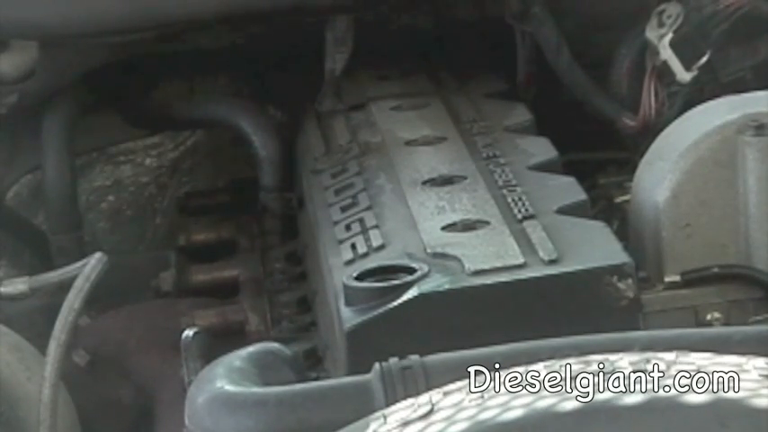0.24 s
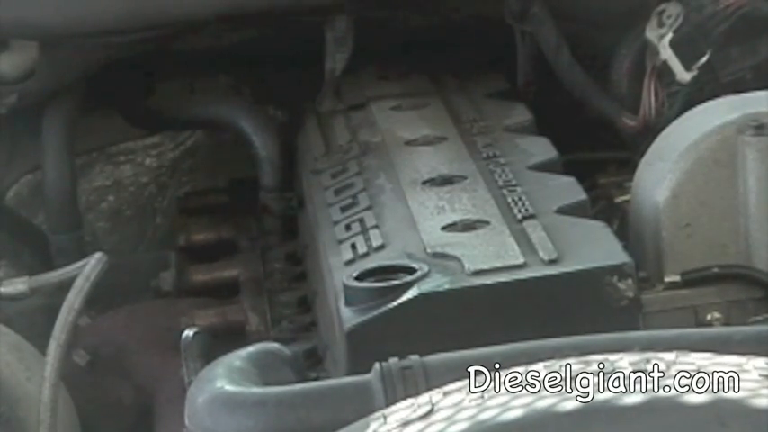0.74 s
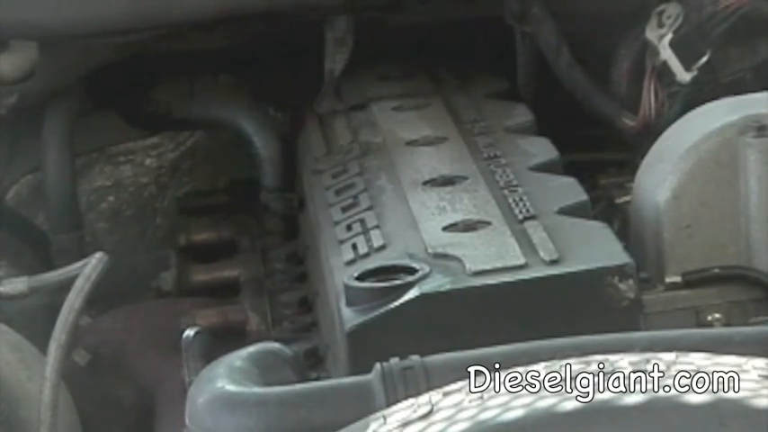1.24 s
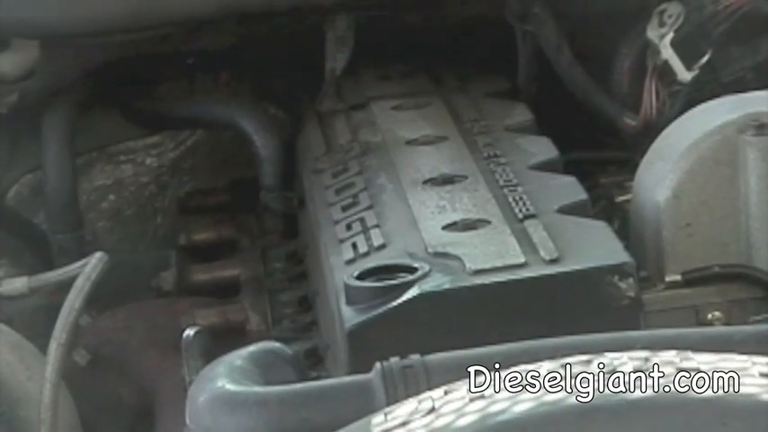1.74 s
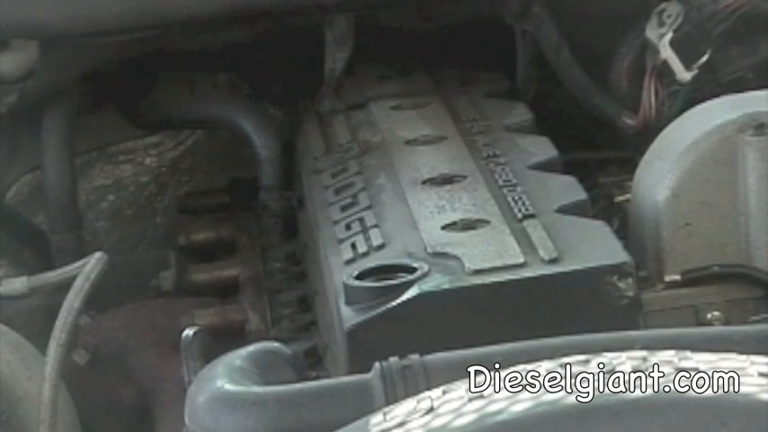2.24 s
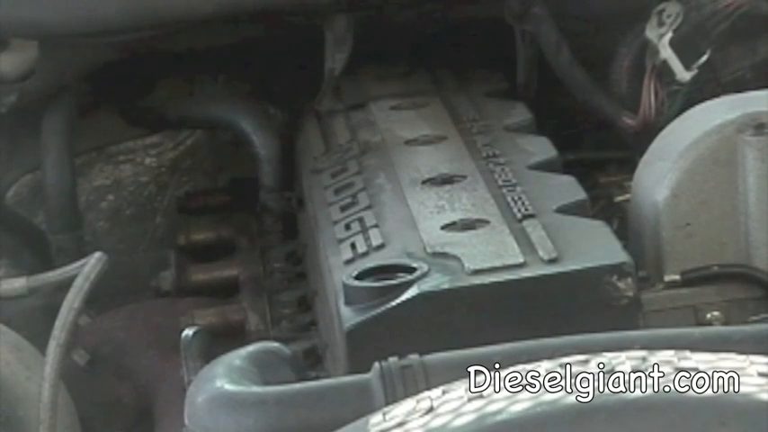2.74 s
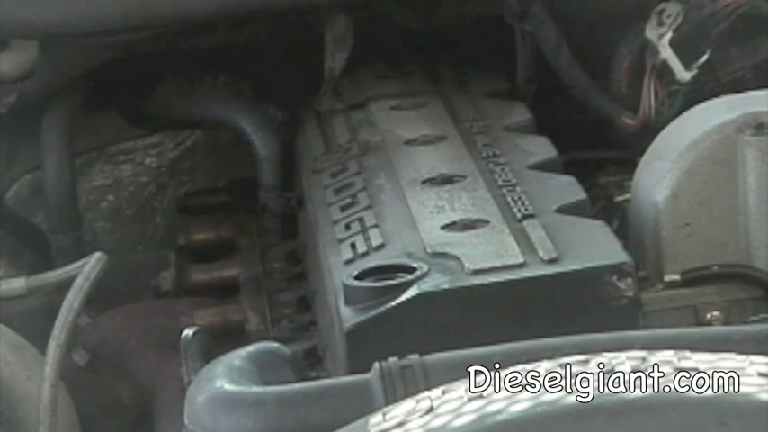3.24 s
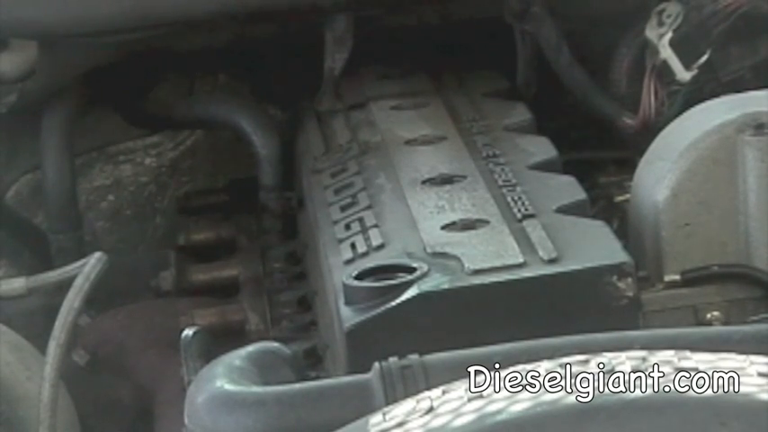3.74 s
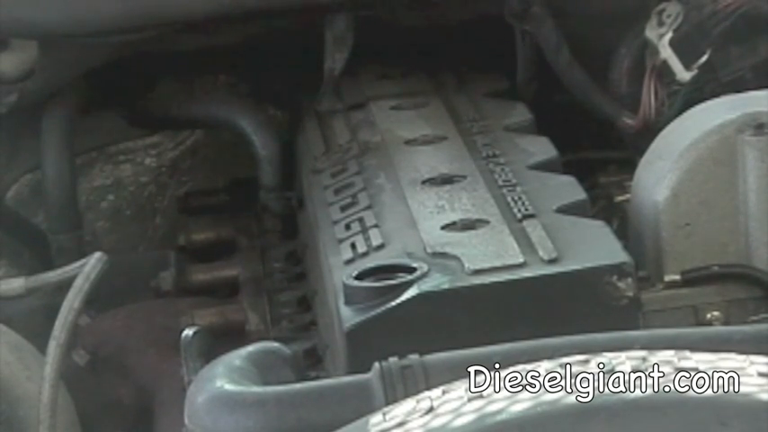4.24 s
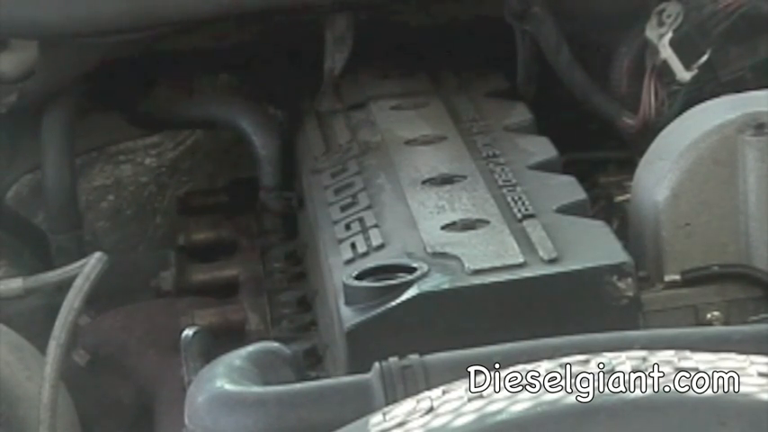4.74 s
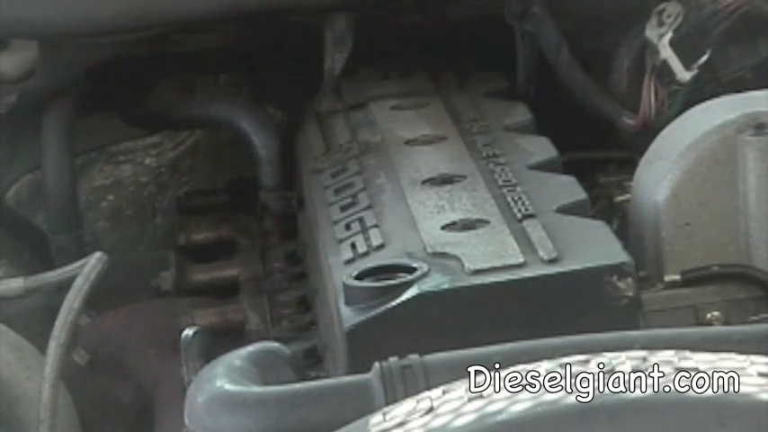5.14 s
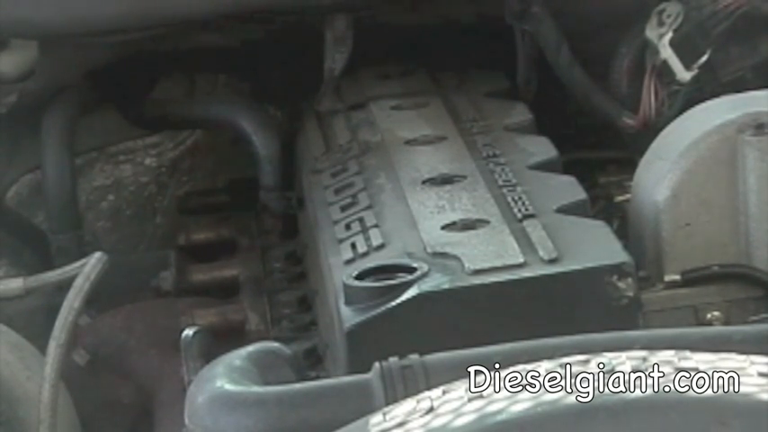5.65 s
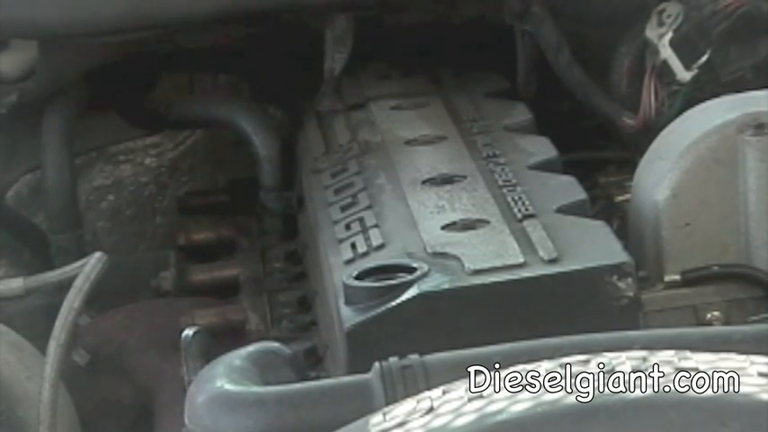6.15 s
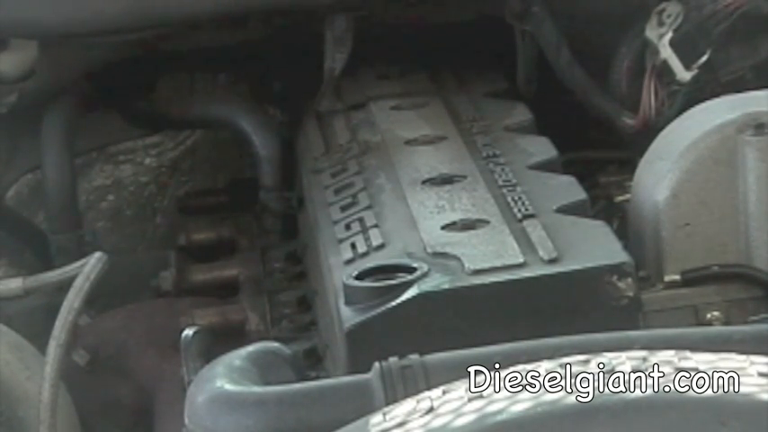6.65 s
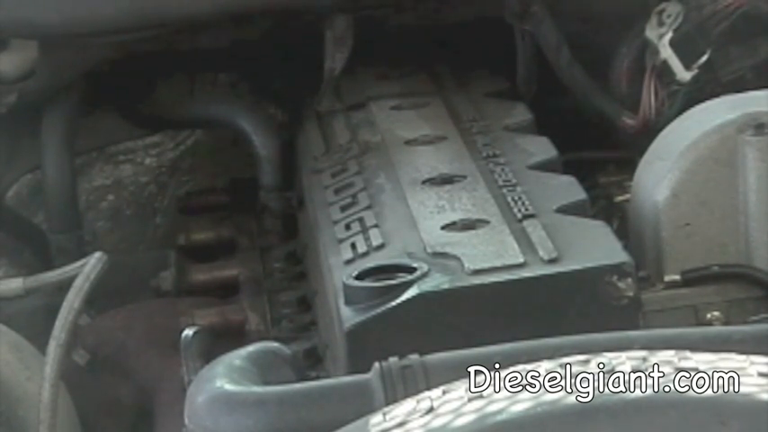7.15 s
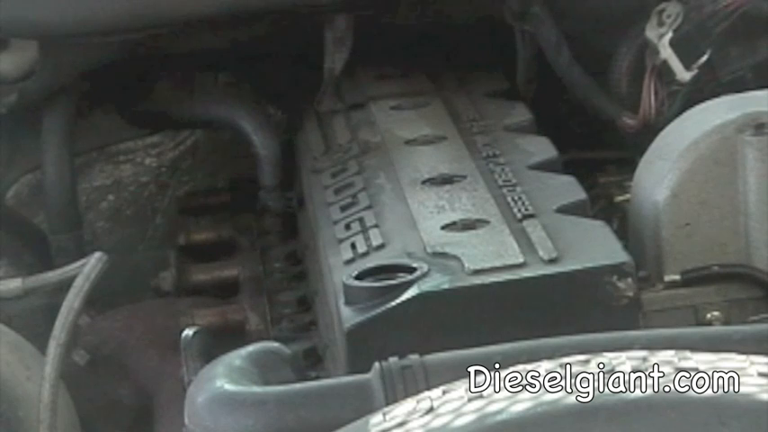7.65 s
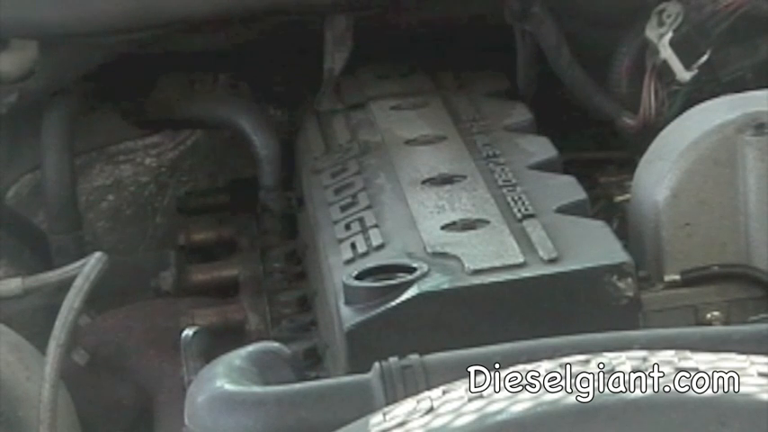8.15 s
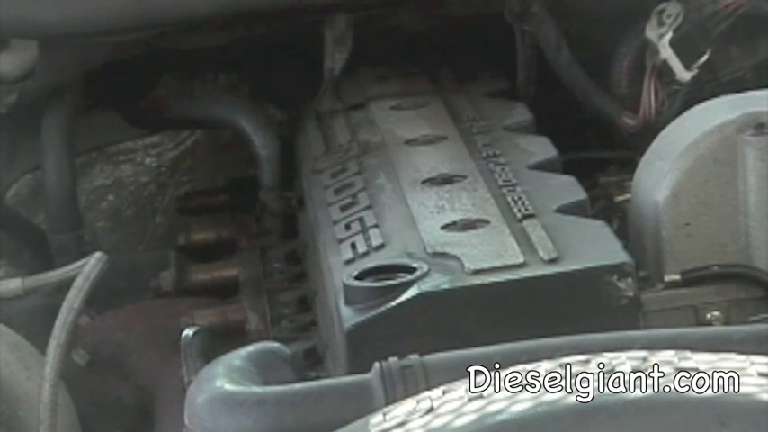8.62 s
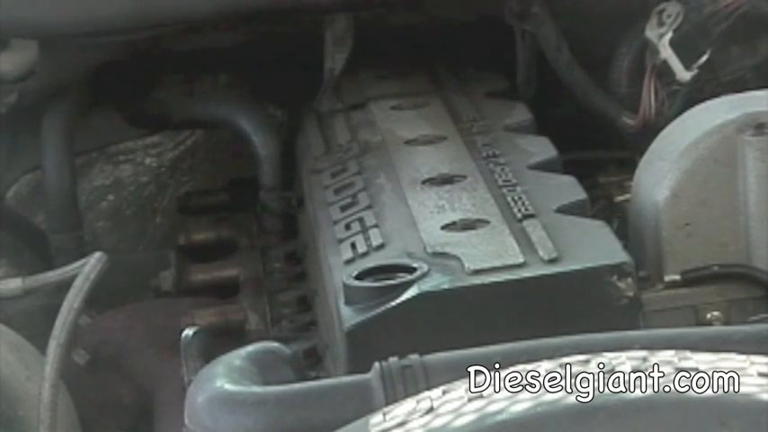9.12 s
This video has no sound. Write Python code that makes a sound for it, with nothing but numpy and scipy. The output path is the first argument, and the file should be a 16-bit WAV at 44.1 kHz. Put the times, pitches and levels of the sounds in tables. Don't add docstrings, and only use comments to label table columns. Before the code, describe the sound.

Faint outdoor hush and key clicks, a short harsh starter crank, then a big six-cylinder diesel fires up and clatters at steady idle.

```python
import sys
import numpy as np
from scipy import signal
from scipy.fft import rfft, irfft, next_fast_len
from scipy.io import wavfile
from scipy.ndimage import uniform_filter1d, map_coordinates

SR = 44100
rng = np.random.default_rng(int(sys.argv[2]) if len(sys.argv) > 2 else 0)


def log_audio(samples):
    frames = np.atleast_2d(samples).T
    limited = np.clip(frames, -1, 1)
    pcm = np.round(limited * 32767).astype(np.int16)
    wavfile.write(sys.argv[1], SR, pcm)


def gain_from_db(level_db):
    decades = np.asarray(level_db, float) / 20
    return 10 ** decades


N = 413658
T = np.arange(N) / SR

# (blow level [dB], blow delay [firings], clatter level [dB], ring level [dB],
# valve level [dB])
CYLINDERS = [(0, .93, 0, -2.5, -9), (-4, .9, 0, -1, -8), (-.5, .93, .5, -1, -7), (-7, .9, -1.5, -3, -8),
             (0, .9, -.7, -1.5, -6), (-6, .92, -1, 0, -7)]
# (frequency [Hz], level [dB per Hz])
CLATTER_COLOUR = [(180, -37), (300, -9), (874, -4.5), (1140, -4.5), (1230, -16), (1390, -4), (1740, -12.5),
                  (2270, -9), (4240, -21), (5000, -21.5), (5610, -24.5), (13000, -27.5), (15300, -67)]
# (frequency [Hz], level [dB per Hz])
BLOW_COLOUR = [(400, -29), (750, -8), (1000, -1), (1300, 4), (1550, -6), (2200, -17.5), (5000, -33)]
# (frequency [Hz], level [dB per Hz])
ROAR_COLOUR = [(15, -37), (25, -35), (50, -19), (75, -12), (143, -8.5), (250, -4.5), (798, -4), (1370, -5),
               (1740, -12.5), (2210, -13), (4220, -22), (4960, -23.5), (13000, -41), (14100, -30),
               (15300, -61)]
# (frequency [Hz], width [Hz], lift [dB])
BLOCK_MODES = [(231, 84, 4.5), (570, 230, 3), (808, 49, 6), (985, 92, 4), (1147, 58, 7.5), (1395, 154, 7),
               (1628, 35, 9.5), (1898, 110, 6.5), (2260, 100, 3.5), (2790, 92, 3), (3440, 19, 6),
               (3060, 70, -1.5), (930, 26, 3), (900, 35, -3), (1244, 33, 0), (1510, 50, -2),
               (4970, 140, 4.5), (5230, 230, -6.5), (6900, 280, 1.5), (8200, 1100, -2.5),
               (10050, 2700, 3.5), (45, 33, -4), (310, 39, -3.5), (485, 14, -3), (148, 25, -2.5)]
# (frequency [Hz], width [Hz], lift [dB])
INJECTOR_MODES = [(4940, 220, 6), (5200, 260, 6), (4600, 250, 3)]
# (time [s], blow change [dB], ring change [dB])
ODD_FIRINGS = [(1.981, -7.8, -2.3), (2.169, 0.9, 5.9), (2.193, 5, 5.1), (2.266, 10, 4.1), (2.316, 4.3, 1.9),
               (2.34, 5.8, 8), (2.491, 3.5, 4.1), (2.517, 6, -3), (2.842, 3.3, 1.2), (2.866, 5, 4),
               (2.916, 2.6, 4.1), (2.99, 2.7, 4), (3.015, 8, -2.2), (3.089, -6.4, 5.6), (3.213, 7, 0.5),
               (3.312, 0, 10), (3.362, 5.6, 5), (3.762, -9, 4.4), (3.988, -2, 9), (4.264, 8, 10),
               (4.439, 4.4, -1.9), (4.814, 8, -1.0), (4.889, 2, 11), (4.939, -9, -1.9), (5.264, 4.8, -6.9),
               (5.314, -16, 6), (5.761, 9, 1), (5.786, 2.0, 10), (5.811, 3, 3), (6.135, 1, 7.8),
               (6.21, 5, 0.5), (6.335, 1, 10), (6.56, 0, 0), (7.009, 1.5, 4), (7.034, 1, 4.7),
               (7.059, -8, 3.1), (7.234, 1.6, 7.1), (7.284, 2.5, -4.6), (7.608, -12, 3.7), (7.633, 0, 8.3),
               (7.758, 0, 4), (7.857, 5.0, 7), (7.907, 6, 3.8), (8.106, -7, 4), (8.23, 5.5, 1.2),
               (8.428, 3, 3.1), (8.576, 1, 3.4), (8.651, 4.5, -4.3), (8.725, -1, 6.3), (8.873, 3, -0.1),
               (8.898, -5, 8), (8.947, 7, 1), (8.972, 3, -0.9), (8.996, -6.8, 0.6), (9.021, 3, -5.3),
               (9.046, -6.4, -0.1), (9.12, 1, 3.8), (9.169, 0, 9), (9.268, 4, -4), (9.293, 9, 8)]
# (time [s], rate [firings per s])
SPEED = [(1.3, 22.15), (1.4, 41.06), (1.5, 54.82), (1.62, 56.83), (1.8, 49.26), (2.05, 42.41), (2.3, 40.44),
         (2.5, 39.21), (2.8, 40.59), (3.3, 40.23), (3.9, 39.71), (4.5, 40.07), (5.1, 39.96), (5.5, 40.3),
         (6.1, 40.04), (7.3, 40.04), (8.7, 40.48), (9.38, 40.51)]
# (time [s], level [dB])
FUEL = [
    (1.35, -5.5),
    (1.45, 1.5),
    (1.55, -4),
    (1.65, -2.5),
    (1.75, -6),
    (1.85, -5),
    (2.15, -0.9),
    (3.4, 0.2),
    (5.3, 0.14),
    (9.38, -1),
]
# (multiple of firing rate [-], level [dB], phase [rad])
EXHAUST = [(1, -56, 3), (2, -40.5, -1), (3, -51, 2.5), (4, -47.5, -1.1), (5, -39, 2), (6, -48.5, 0),
           (10, -39, 1.4), (20, -38.5, -0.5)]
# (time [s], level [dB], level of upper multiples [dB])
EXHAUST_SWELL = [
    (1.3, -23, -15),
    (1.45, -2, -12),
    (1.55, -1, -26),
    (1.75, -11.5, -17),
    (1.95, -1, 4),
    (2.4, -1, -4),
    (2.6, -3, 0),
    (6, -1, 1),
    (9.38, -9, 0),
]
# (centre time [s], length [s], start pitch [Hz], end pitch [Hz], level [dB])
WHINES = [(3.0, 3.6, 590, 584, -25), (5.2, 2.2, 560, 568, -24), (6.55, 1.3, 566, 556, -23),
          (5.1, 3, 742, 733, -24), (7.55, 2.2, 695, 640, -21.5), (7.8, 1.6, 528, 495, -26),
          (4.9, 2.6, 822, 822, -26), (6.2, 1.6, 243, 240, -27), (8.8, 1.1, 812, 808, -26),
          (2.2, 1.4, 800, 806, -27), (4.4, 1.2, 408, 400, -29), (7.9, 1, 215, 205, -28),
          (2.8, 1.2, 430, 428, -28)]
# (lap [count], level change [dB])
BELT_ODD_LAPS = [(2, 6), (5, 6), (7, 5), (8, -8), (10, 7), (11, -8), (15, 10), (17, 6), (19, -8), (22, 4),
                 (24, -8), (25, -8), (26, 5)]
# (frequency [Hz], level [dB per Hz])
GRIND_COLOUR = [(59, -57), (100, -38), (200, -20), (694, -7), (838, 2), (1060, -0.5), (1580, -2.5),
                (2450, -12.5), (2780, -12), (4910, -20.5), (10000, -23), (13500, -28), (15300, -56)]
# (time [s], level [dB])
STARTER_LOAD = [
    (0.85, -16.5),
    (0.904, -6.5),
    (0.974, -8),
    (1.042, -13),
    (1.1, -7.5),
    (1.192, -17),
    (1.214, -10),
    (1.315, -12),
    (1.47, -8),
]
# (centre time [s], length [s], level [dB])
MOTOR_HUM = [
    (.943, .2, -40),
    (1.05, .2, -46),
    (1.164, .17, -39.5),
    (1.27, .11, -43),
    (1.42, .18, -31.5),
]
# (centre time [s], length [s], pitch
# [Hz], level [dB])
SQUEALS = [(.719, .02, 470, -37), (.738, .045, 520, -37), (.89, .035, 815, -14), (.935, .03, 835, -14),
           (.953, .022, 835, -8), (.971, .018, 830, -4.5), (.993, .031, 830, -2.5), (1.02, .03, 825, -15),
           (1.055, .035, 805, -13), (.92, .06, 1190, -17), (.87, .05, 1600, -16), (.925, .04, 1575, -18),
           (.962, .05, 1620, -17), (1.045, .04, 1580, -18), (.96, .04, 2250, -27), (1.112, .03, 2230, -25),
           (.862, .03, 2500, -24), (.927, .03, 2820, -24), (1.09, .04, 2800, -30), (1.178, .042, 2800, -33),
           (.965, .04, 3170, -27), (1.06, .06, 3170, -28), (1.135, .05, 3380, -33), (1.18, .04, 3500, -33),
           (1.34, .07, 4400, -33)]
# (centre time [s], length [s], start pitch [Hz], end pitch [Hz],
# level [dB])
SAGS = [(.921, .047, 1500, 1300, -14), (1.04, .05, 1150, 1180, -18), (1.072, .045, 1050, 880, -6.5),
        (1.092, .035, 1030, 990, -10), (1.112, .04, 960, 900, -10), (1.12, .05, 800, 900, -16),
        (1.1, .03, 1680, 1560, -16), (1.11, .03, 1520, 1320, -12), (1.133, .055, 1340, 1330, -10.5),
        (1.14, .03, 1400, 1450, -17), (1.085, .057, 1950, 1810, -23), (1.045, .04, 4420, 4250, -36),
        (1.07, .05, 4200, 3950, -36), (1.212, .018, 1290, 1200, -5), (1.222, .012, 1200, 1080, -4),
        (1.23, .012, 1100, 980, -9), (1.235, .05, 1250, 1050, -16), (1.26, .053, 980, 837, -15),
        (1.25, .02, 2500, 2300, -26), (1.266, .02, 2400, 2100, -26)]
# (time [s], level [dB], time to fall 60 dB [s], rise [s], treble tilt [dB])
KEY_CLICKS = [
    (.303, -25, .19, .008, -2),
    (.322, -33, .15, .004, -3),
    (.39, -44, .06, .002, 0),
    (.714, -44, .084, .002, 10),
    (.826, -41, .14, .002, 9),
]
# (time [s], level [dB], time to fall 60 dB [s], treble tilt [dB],
# housing ring level [dB])
PINION = [
    (.847, -16, 0.21, 9, 6),
    (1.209, -21.5, 0.2, 5, -12),
]
# (time [s], level [dB], treble tilt [dB], tooth kick pitch [Hz], kick level [dB])
FIRST_FIRINGS = [(1.318, -8, -6, 1310, -2), (1.357, -14, 10, 1390, -5), (1.386, -8.5, -9, 1400, -6),
                 (1.411, -14, -2, 1260, -12), (1.432, -16, 0, 1550, -9), (1.455, -24, 8, 900, -16),
                 (1.472, -13, -4, 1290, -7), (1.494, -25, -6, 1340, -20), (1.509, -18, -4, 1250, -17),
                 (1.526, -24, -4, 1300, -16), (1.545, -17, -1, 1420, -7), (1.564, -15, 0, 1340, -10),
                 (1.581, -19, -9, 1270, -14)]
# (frequency [Hz], level [dB], time to fall 60 dB [s])
HOUSING = [(830, -23, 5.0), (1430, 5, 0.1), (1580, 2, 0.95), (2234, -22, 5.0), (2820, 2, 0.046),
           (5100, -26, 0.21), (6100, -19, 0.21), (6840, -27, 0.18), (7340, -24, 0.13), (7700, -19, 0.16)]
# (frequency [Hz], level [dB per Hz])
PANEL_COLOUR = [(150, -32), (350, -4.5), (700, -6), (1300, 0.5), (2000, -11), (4000, -20), (8000, -27),
                (14000, -33), (15300, -52)]
# (frequency [Hz], width [Hz], lift [dB])
DASH_MODES = [(350, 28, 12), (506, 40, 2), (1060, 40, 5), (1570, 66, 10), (2270, 80, 4), (3140, 60, 0),
              (3580, 47, 19), (4340, 60, 17)]
# (frequency [Hz], level [dB per Hz])
YARD_COLOUR = [(15, -65), (25, -23), (129, 1), (139, -20), (168, -0.5), (187, -9), (245, -4), (296, -13),
               (431, -8), (594, -18.5), (1330, -24.5), (2210, -33), (4450, -37.5), (13000, -44),
               (15300, -55)]
# (frequency [Hz], width [Hz], lift [dB])
HUMS = [(1280, 60, 5), (1500, 40, 4), (2810, 200, 7), (3550, 500, -4), (4410, 120, 10), (5680, 60, 3)]
# (centre time [s], length [s], start pitch [Hz], end pitch [Hz], level [dB])
BIRDS = [
    (.125, .03, 4050, 3650, -65),
    (.195, .07, 3600, 4250, -61),
    (.405, .03, 4300, 3700, -64),
    (.6, .03, 4800, 4200, -64),
]
# (frequency [Hz], difference minus sum [dB])
WIDTH = [(60, -32), (110, -41), (200, -63), (380, -30.5), (700, -17.5), (1280, -14.5), (2370, -10),
         (4370, -13), (8050, -5.5), (14900, -8)]
# (frequency [Hz], left minus right [dB])
BALANCE = [(300, 0), (1000, -.5), (2500, -.9), (5000, -.3), (12000, -.8)]


def engine():
    s, fired = crank()
    count = np.arange(int(fired[-1]))
    cylinder = (count + 1) % len(CYLINDERS)
    blow_db, delay, clatter_db, ring_db, valve_db = np.array(CYLINDERS)[cylinder].T
    chance = rng.standard_normal((len(count), 6))
    inject = np.interp(count + .61, fired, s) + .0002 * chance[:, 0]
    burn = np.interp(count + delay - .17, fired, s) + .0004 * chance[:, 5]
    close = np.interp(count + 1.3, fired, s)

    odd_s, odd_blow_db, odd_ring_db = np.transpose(ODD_FIRINGS)
    odd = np.abs(burn[:, None] - odd_s) < .01
    blow_db = blow_db + 1.2 * odd @ odd_blow_db - 7 * (burn < 1.6)
    ring_db = ring_db + odd @ odd_ring_db

    clatter = bursts(inject, clatter_db + .8 * chance[:, 1], cylinder, t60=.07, rise=.003, same=.5, grain_db=1.8)
    clatter += bursts(close, valve_db + 2 * chance[:, 2], cylinder, t60=.047, rise=.0024, same=.28, grain_db=-1)
    clatter = unit(coloured(clatter, lambda hz: along(CLATTER_COLOUR, hz) + lift(hz, BLOCK_MODES)))
    blow = bursts(burn, blow_db + .6 * chance[:, 3], cylinder, t60=.032, rise=.004, same=.8, grain_db=.5)
    blow = unit(coloured(blow, lambda hz: along(BLOW_COLOUR, hz) + lift(hz, BLOCK_MODES)))
    roar = rng.standard_normal((2, N)) * gain_from_db(.8 * wobble(25) + .6 * wobble(3.9))
    roar = unit(coloured(roar, lambda hz: along(ROAR_COLOUR, hz) + lift(hz, BLOCK_MODES)))

    burn_db = -.7 - 2 * np.exp(-T / 3.54) + 2 * (T / T[-1]) ** 2
    knock = clatter + gain_from_db(burn_db) * blow + gain_from_db(-10) * pings(inject, count=12)
    body = unit(knock + gain_from_db(2.5) * roar)
    level_db, treble_db, bass_db, injector_db = warm_up()
    high, upper = above(body, edge_hz=2000), above(body, edge_hz=450)
    body = gain_from_db(treble_db + 9) * high + upper - high + gain_from_db(bass_db + 10.5) * (body - upper)

    ring = bursts(burn, ring_db + 1.2 * chance[:, 4], cylinder, t60=.03, rise=.001, same=.4, grain_db=1)
    ring += bursts(close, valve_db - 2.5 + 2 * chance[:, 2], cylinder,
                   t60=.042, rise=.00095, same=.1, grain_db=4)
    ring = unit(coloured(ring, lambda hz: -20 * np.log10(1 + (2 * (hz - 5000) / 800) ** 2)
                         + lift(hz, INJECTOR_MODES)))

    running = np.clip((T - 1.3) / .026, 0, 1)
    sides = running * gain_from_db(level_db) * (gain_from_db(1) * body + gain_from_db(injector_db - 4.5) * ring)
    whines = gain_from_db(1.2 * wobble(7) - .8) * glides(WHINES)
    return sides + [[1], [0]] * (running * exhaust(s, fired)) + whines


def exhaust(s, fired):
    angle = 2 * np.pi * uniform_filter1d(np.interp(T, s, fired), size=SR // 10)
    pipe_db, upper_db = curves(EXHAUST_SWELL)
    out = np.zeros(N)
    for k, db, rad in EXHAUST:
        level_db = db + 7 + (k > 2) * upper_db + .7 * np.sqrt(k) * wobble(6.4)
        out += gain_from_db(level_db) * np.cos(k * angle + rad + .018 * k * wobble(3.6))
    return gain_from_db(pipe_db) * out


def pings(times, count):
    chance = rng.random((len(times), count, 4))
    start = (times[:, None] + .014 * chance[..., 0] ** 2).ravel()
    hz = (1700 * 4.5 ** chance[..., 1]).ravel()[:, None]
    db = along(CLATTER_COLOUR, hz[:, 0]) + 10 * np.log10(hz[:, 0]) + 8 * chance[..., 2].ravel()
    t = np.arange(SR // 50) / SR
    rows = gain_from_db(db[:, None] - 60 * t / .082) * (1 - np.exp(-t / .0003)) * np.sin(2 * np.pi * hz * t)
    sign = np.sign(chance[..., 3].ravel() - .5)[:, None]
    return unit(place((rows, sign * rows), start, t))


def crank():
    rate, = curves(SPEED)
    start = round(SPEED[0][0] * SR)
    return T[start:], .112 + np.cumsum(rate[start:]) / SR


def warm_up():
    flow_from_s, flow_rise_s, warm_s = 1.6, .22, 3.54
    fuel_db, = curves(FUEL)
    late = np.clip(1 - (T - flow_from_s) / flow_rise_s, 0, 1)
    warm = 1 - np.exp(-np.maximum(T - flow_from_s, 0) / warm_s)
    level_db = -14 + fuel_db + .047 * wobble(2.96)
    treble_db = -10 - 3 * late + 3.5 * warm - .31 * fuel_db + .5 * wobble(3.1)
    bass_db = -11 - 9 * late - 1.4 * fuel_db + (2.5 * warm - .5) + .31 * wobble(3.1)
    injector_db = -31 + 21.5 * warm + .4 * wobble(2.3)
    return level_db, treble_db, bass_db, injector_db


def belt():
    first, lap_length = 16.29, 11.215
    out, t = np.zeros((2, N + SR)), np.arange(SR // 40) / SR
    s, fired = crank()
    for lap in range(int((fired[-1] - first) / lap_length) + 1):
        hz = 8470 + 140 * rng.standard_normal()
        db = -30 + dict(BELT_ODD_LAPS).get(lap, 0)
        band = signal.butter(2, [hz - 450, hz + 450], "band", fs=SR, output="sos")
        chirp = unit(signal.sosfilt(band, rng.standard_normal((2, len(t)))))
        at = round(np.interp(first + lap * lap_length, fired, s) * SR)
        out[:, at:][:, :len(t)] += gain_from_db(db - 60 * t / .065) * (1 - np.exp(-t / .002)) * chirp
    return out[:, :N]


def starter():
    grind_db, = curves(STARTER_LOAD)
    treble_db = -13.5 - .83 * (grind_db + 12) + 18 * np.exp(-np.abs(T - .85) / .024)
    treble_db += 3.5 * (T > FIRST_FIRINGS[0][0])
    teeth = rng.standard_normal((2, N)) * gain_from_db(.91 * wobble(60.1))
    grind = unit(coloured(teeth, lambda hz: along(GRIND_COLOUR, hz) + .58 * lift(hz, BLOCK_MODES)))
    high = above(grind, edge_hz=2800)
    engaged = np.clip((T - .848) / .003, 0, 1) * np.clip((1.47 - T) / .02, 0, 1)
    out = engaged * gain_from_db(grind_db - 7) * (grind - high + gain_from_db(treble_db + 13.5) * high)

    hum = sum(gain_from_db(db) * np.cos(np.pi * np.clip((T - s) / length, -.5, .5)) for s, length, db in MOTOR_HUM)
    out[0] += engaged * gain_from_db(4.5) * hum * np.sin(2 * np.pi * np.cumsum(240 + 6 * wobble(8)) / SR)
    steady = [(s, length, hz, hz, db) for s, length, hz, db in SQUEALS]
    kicks = [(s + .006, .011, hz * 1.03, hz * .97, db) for s, _, _, hz, db in FIRST_FIRINGS]
    return out + glides(steady + SAGS + kicks)


def contacts():
    out, t = np.zeros((2, N)), np.arange(SR // 5) / SR
    hits = [(*row, -40) for row in KEY_CLICKS]
    hits += [(s, db, t60, .0049, treble_db, ring_db) for s, db, t60, treble_db, ring_db in PINION]
    hits += [(s, db, .035, .002, treble_db, -5) for s, db, treble_db, *_ in FIRST_FIRINGS]
    for s, db, t60, rise, treble_db, ring_db in hits:
        puff = coloured(rng.standard_normal((2, len(t))), lambda hz: along(PANEL_COLOUR, hz)
                        + lift(hz, DASH_MODES) + treble_db * np.log2(1 + hz / 2500))
        crisp = above(puff, edge_hz=2000)
        puff = puff - crisp + gain_from_db(4 - 50 * t / t60) * crisp
        ring = np.zeros(len(t))
        for hz, level, decay in HOUSING:
            fall_db = 60 * t / min(decay, .7 * t60)
            ring += gain_from_db(level + rng.normal(0, 3.5) - fall_db) * np.sin(2 * np.pi * hz * t)
        hit = gain_from_db(-60 * t / t60) * unit(puff) + gain_from_db(ring_db) * ring
        out[:, round(s * SR):][:, :len(t)] += gain_from_db(db) * (1 - np.exp(-t / rise)) * hit
    return out


def yard():
    air = coloured(rng.standard_normal((2, N)), lambda hz: along(YARD_COLOUR, hz) + lift(hz, HUMS))
    level_db = -43 + .38 * wobble(10.8) - 10 * np.clip((T - .85) / .1, 0, 1)
    return gain_from_db(level_db) * unit(air) + glides(BIRDS)


def bursts(times, db, cylinder, t60, rise, same, grain_db):
    t = np.arange(SR // 20) / SR
    own = rng.standard_normal((2, 6, len(t)))
    fresh = rng.standard_normal((2, len(times), len(t)))
    same = np.clip(same, 0, 1)
    grains = np.repeat(rng.standard_normal((len(times), len(t) // 45)), 45, axis=1)
    shape = gain_from_db(db[:, None] + grain_db * grains - 60 * t / t60) * (1 - np.exp(-t / rise)) ** 2
    rows = (np.sqrt(same) * own[:, cylinder] + np.sqrt(1 - same) * fresh) * shape
    return place(rows, times, t)


def place(paths, times, t):
    at = (np.round(times * SR).astype(int)[:, None] + np.arange(len(t))).ravel()
    return np.array([np.bincount(at, rows.ravel(), N + SR)[:N] for rows in paths])


def glides(rows):
    out = np.zeros((2, N))
    for s, length, from_hz, to_hz, db in rows:
        size = round(length * SR)
        angle = 2 * np.pi * np.cumsum(np.linspace(from_hz, to_hz, size)) / SR + rng.uniform(0, 2 * np.pi)
        tone = np.sin(angle) + gain_from_db(-38) * np.sin(4 * angle)
        out[0, round(s * SR) - size // 2:][:size] += gain_from_db(db) * np.hanning(size) * tone
    return out


def unit(x):
    return x / np.sqrt(np.mean(x ** 2) + 1e-20)


def along(points, hz):
    f, v = np.transpose(points)
    return np.interp(np.log(hz + 1), np.log(f + 1), v)


def lift(hz, modes):
    return sum(db / (1 + (2 * (hz - c) / w) ** 2) for c, w, db in modes)


def curves(rows):
    s, *cols = np.transpose(rows)
    return [np.interp(T, s, c) for c in cols]


def wobble(rate):
    return map_coordinates(rng.standard_normal(int(N * rate / SR) + 4), [T * rate])


def coloured(x, db_of):
    size = 2 ** 13
    log_gain = np.maximum(db_of(np.fft.rfftfreq(size, 1 / SR)), -120) * np.log(10) / 20
    cep = irfft(log_gain)
    cep[1:size // 2] *= 2
    cep[size // 2 + 1:] = 0
    response = irfft(np.exp(rfft(cep)))[None, :size // 2]
    return signal.oaconvolve(x, response, axes=1)[:, :x.shape[1]]


def above(x, edge_hz):
    return signal.sosfiltfilt(signal.butter(2, edge_hz, "high", fs=SR, output="sos"), x)


def scene():
    size = next_fast_len(N)
    hz = np.fft.rfftfreq(size, 1 / SR)
    mid, scattered = rfft(engine() + belt() + starter() + contacts() + yard(), size)
    side = gain_from_db(along(WIDTH, hz)) * scattered
    tilt = gain_from_db(along(BALANCE, hz) / 2)
    return irfft([(mid + side) * tilt, (mid - side) / tilt], size)[:, :N]


def top_cut(x):
    return signal.sosfilt(signal.butter(12, 15460, fs=SR, output="sos"), x)


def record(dry):
    mix = dry / (1 + np.abs(dry / .98) ** 6) ** (1 / 6)
    mix = signal.sosfiltfilt(signal.cheby2(12, 25, 15000, fs=SR, output="sos"), mix)
    return top_cut(mix)


dry = scene()
out = record(dry)
log_audio(out)
```